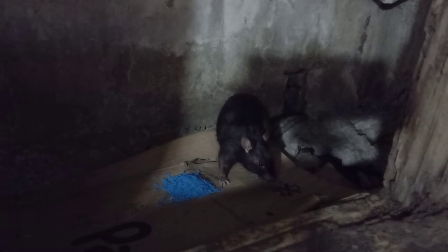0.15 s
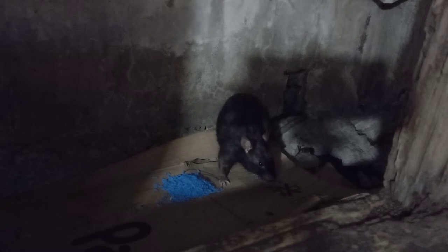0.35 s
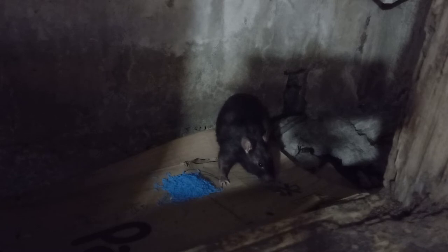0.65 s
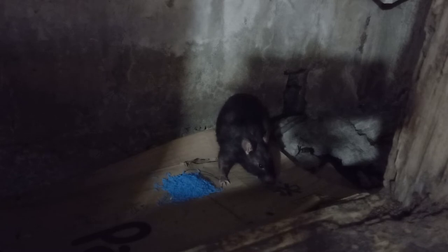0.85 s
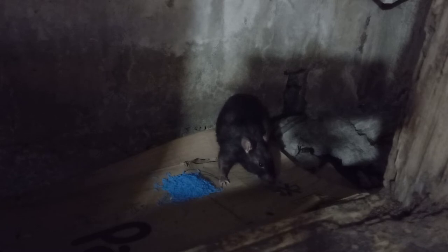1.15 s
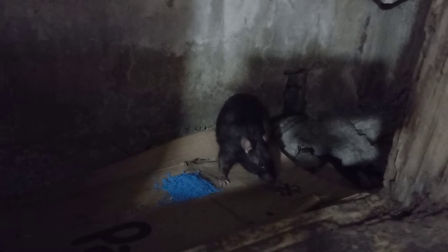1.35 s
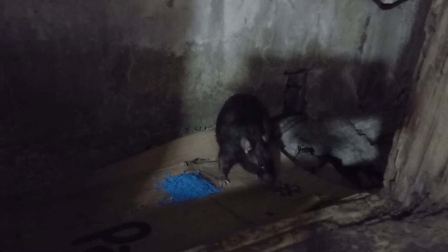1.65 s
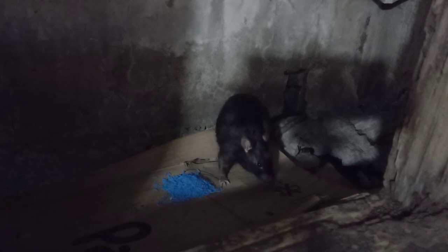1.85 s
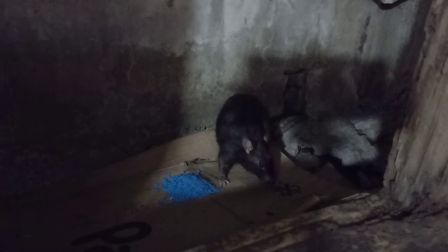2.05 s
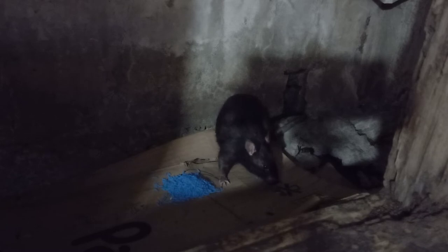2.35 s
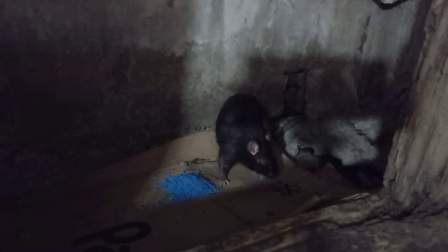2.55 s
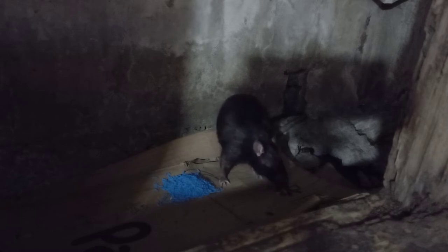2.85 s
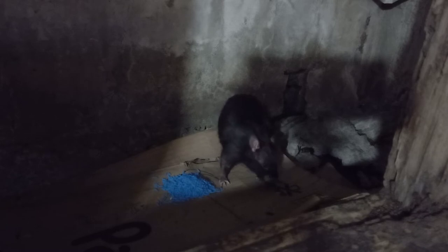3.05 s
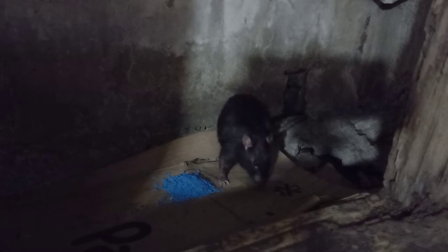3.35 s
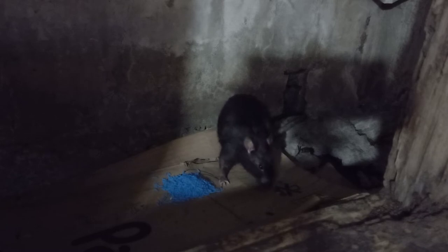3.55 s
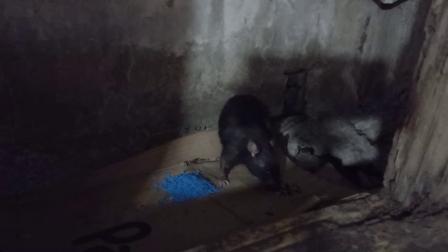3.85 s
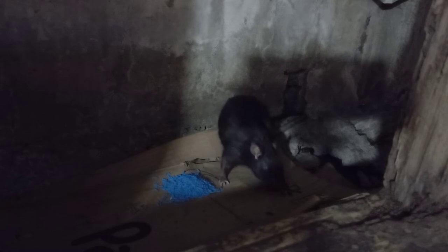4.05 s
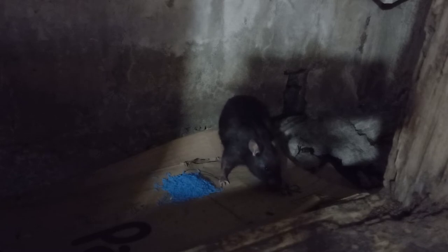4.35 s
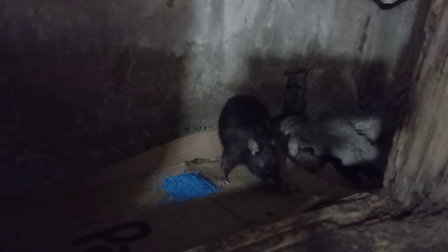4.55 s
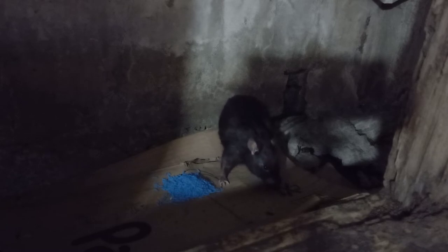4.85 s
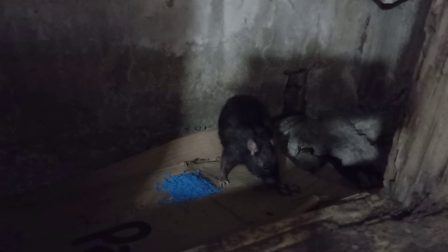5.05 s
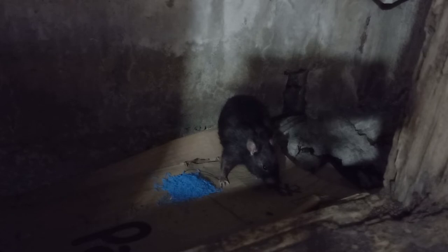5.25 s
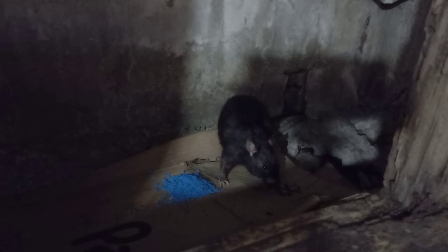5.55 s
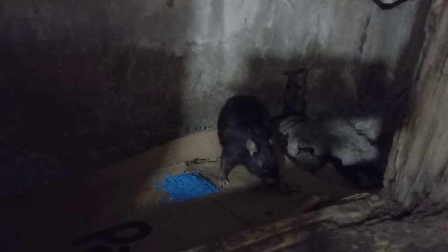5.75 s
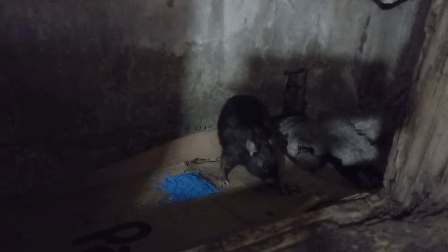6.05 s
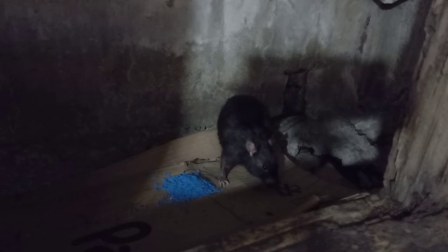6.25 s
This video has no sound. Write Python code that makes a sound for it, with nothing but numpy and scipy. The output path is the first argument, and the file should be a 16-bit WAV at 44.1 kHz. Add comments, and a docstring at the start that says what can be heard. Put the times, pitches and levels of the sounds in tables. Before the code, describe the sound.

Steady low mains hum and airy rush, with crisp gnawing clicks up close, a faint early squeak and a few dull floor thuds.

```python
"""Rat cracking pellets beside a machine

Near a bare masonry corner teeth crack hard pellets: short bursts of impulses ring damped resonances.
A mains-driven machine buzzes and throbs and other motors drone (sums of tones); air rushes (shaped noise).
Further off something squeaks once (three gliding partials in a noise-tail echo); soft scuffs swell
(noise under envelopes) and thuds ring the floor (decaying modes). Two ports of one microphone hear it."""
import sys
import numpy as np
from scipy import signal
from scipy.fft import rfft, irfft, next_fast_len
from scipy.io import wavfile
from scipy.ndimage import map_coordinates

SR = 44100
rng = np.random.default_rng(int(sys.argv[2]) if len(sys.argv) > 2 else 0)


def nominal_scale(level):
    """Amplitude ratio for a level in decibels (scalar or array-like)."""
    x = np.asarray(level, float) / 20
    return 10 ** x


def waveform_to_disk(signal):
    """Save audio, clipped to [-1, 1], as 16-bit WAV at the path in sys.argv[1]."""
    frames = np.transpose(np.atleast_2d(signal))
    scaled = np.clip(frames, -1, 1) * 32767
    samples = np.round(scaled).astype(np.int16)
    wavfile.write(sys.argv[1], SR, samples)


N = 282240


def along(points, hz):
    """Interpolate (f/Hz, value) points on a log-frequency axis."""
    f, v = np.transpose(points)
    return np.interp(np.log(hz + 1), np.log(f + 1), v)


def wobble(knots_per_s):
    """Smooth random curve through normally distributed knots."""
    knots = rng.standard_normal(int(N * knots_per_s / SR) + 4)
    return map_coordinates(knots, [np.arange(N) * knots_per_s / SR])


def filtered(x, response):
    """Multiply the spectrum of x by response(f/Hz), real or complex."""
    m = next_fast_len(x.shape[-1] + 8192)
    spectrum = rfft(x, m) * response(np.fft.rfftfreq(m, 1 / SR))
    return irfft(spectrum, m)[..., :x.shape[-1]]


def diffuse(density, size):
    """Stereo noise from all sides: the mid/side split sets how alike the ports are at each frequency."""
    # port likeness of diffuse sound: f/Hz, correlation (-1..1)
    likeness = [(60, 1), (130, 0.99), (290, 0.91), (640, 0.42), (1410, -0.17), (3100, -0.11), (6820, 0.096),
                (15000, -0.0079)]

    def mid_side_gain(hz):
        angle = np.arccos(np.clip(along(likeness, hz), -1, 1)) / 2
        return np.sqrt(SR / 2) * nominal_scale(along(density, hz)) * [np.cos(angle), np.sin(angle)]

    mid, side = filtered(rng.standard_normal((2, size)), mid_side_gain)
    return np.array([mid + side, mid - side])


def modes(table):
    """Causal response of damped resonances in parallel, with alternating signs."""
    def response(f):
        total = 0
        for k, (centre_hz, width_hz, db) in enumerate(table):
            damping = 1j * f * width_hz
            total = total + (-1) ** k * nominal_scale(db) * damping / (centre_hz ** 2 - f * f + damping)
        return total
    return response


def echo(x, decay, gap_s):
    """Third-of-a-second noise tail per channel, each frequency dying at its own speed."""
    hz, t, z = signal.stft(rng.standard_normal((2, SR // 3)), SR, nperseg=128)
    fade = nominal_scale(-60 * t / along(decay, hz)[:, None])
    tail = signal.istft(z * fade, SR, nperseg=128)[1]
    late = np.pad(x, (round(gap_s * SR), 0))[None]
    return signal.fftconvolve(late, tail / np.linalg.norm(tail[0]), axes=1)[:, :len(x)]


def tone(phase, left_db, right_db, lead_rad):
    """Tone that reaches each port at its own rms level and phase."""
    left = nominal_scale(left_db) * np.cos(phase + lead_rad)
    right = nominal_scale(right_db) * np.cos(phase)
    return np.sqrt(2) * np.array([left, right])


def machines():
    """Mains buzz throbs in level and phase once a shaft turn, more at higher multiples; motors and a fan drone."""
    # loudest buzz lines, mostly odd multiples of twice mains:
    # mains multiple, left level/dB, right level/dB, left lead/rad
    buzz = [(2, -43, -41, 0), (4, -65, -60, -.4), (6, -47, -49, .5), (10, -61, -71, 2.1),
            (14, -68, -71, 2.2), (18, -74, -63, -1.2), (21, -70, -71, 2.7), (22, -59, -62, -3),
            (25, -70, -76, -.9), (26, -60, -66, -1.2), (27, -75, -76, .7), (30, -68, -81, -.9),
            (34, -69, -73, 1.9), (38, -71, -78, 1), (50, -87, -78, -.5), (54, -84, -78, 2.1),
            (69, -83, -98, -1.5), (70, -78, -86, .3), (75, -85, -85, .7)]
    # outline round which the other multiples scatter: f/Hz, level/dB
    faint_outline = [(720, -74), (1700, -78), (2300, -87), (2800, -85.5), (3250, -87), (3500, -99),
                     (4300, -90), (6100, -103.5)]
    # side tones the shaft throb splits off the low hum: mains multiple, shaft orders away, level/dB
    side_tones = [(2, 1, -66), (2, 2, -65), (6, -2, -67), (6, -1, -67), (6, 1, -66)]
    # other motors slipping below mains: shaft f/Hz, left lead/(rad/kHz), [(shaft order, level/dB)]
    motors = [(57.5, -.5, [(1, -63), (2, -64.5), (4, -66.5), (5, -59.5), (9, -65)]),
              (58.17, -3.1, [(3, -66), (14, -75), (15, -76.5), (16, -77), (27, -81.5)]),
              (58.0, -.5, [(20, -79), (21, -71.5), (22, -73)])]
    # unrelated low tones: f/Hz, level/dB
    drones = [(65.5, -60), (70.6, -64.5), (98.9, -60.5), (145.6, -65.5), (166.5, -64.5), (333, -66.5),
              (388.5, -66), (444, -66.5), (532.2, -68.5)]
    # fan tone just under the main hum, beating with it: f/Hz, mean level/dB, t of a swell/s
    fan = (111.65, -52, .023)
    mains_hz = 59.946
    shaft_hz = mains_hz / 8
    faint_scatter_db = 3

    t = np.arange(N) / SR
    loud = [row[0] for row in buzz]
    faint = []
    for k in range(12, 103):
        if k not in loud and (k % 2 == 0 or k > 18):
            ports_db = along(faint_outline, k * mains_hz) + faint_scatter_db * rng.standard_normal(2)
            faint.append((k, *ports_db, rng.uniform(0, 2 * np.pi)))

    out = np.zeros((2, N))
    for k, *ports in buzz + faint:
        depth_rad = .009 * k
        start = rng.uniform(0, 2 * np.pi) * (k > 2)  # the main hum sets time zero
        shaft = 2 * np.pi * shaft_hz * t + rng.uniform(0, 2 * np.pi)
        phase = 2 * np.pi * k * mains_hz * t + start + depth_rad * np.sin(shaft)
        out += (1 + .5 * depth_rad * np.cos(shaft)) * tone(phase, *ports)

    lines = [(hz * k, db, lead * hz * k / 1000) for hz, lead, orders in motors for k, db in orders]
    lines += [(hz, db, 0) for hz, db in drones]
    lines += [(k * mains_hz + away * shaft_hz, db, 0) for k, away, db in side_tones]
    for hz, db, lead in lines:
        phase = 2 * np.pi * hz * t + rng.uniform(0, 2 * np.pi) + 0.16 * wobble(1.35)
        out += tone(phase, db, db, lead)

    hz, db, swell_s = fan
    phase = 2 * np.pi * (hz * t + (2 * mains_hz - hz) * swell_s) + 0.56 * wobble(1.49)
    return out + nominal_scale(3.1 * wobble(2.32)) * tone(phase, db, db, 0)


def air():
    """Smooth far rush: diffuse shaped noise whose level drifts a little."""
    # rushing air and machine noise, ahead of drift and port colour: f/Hz, density/(dB/Hz)
    rush = [(30, -95), (45, -93), (62, -69), (110, -73.5), (170, -73), (290, -76.5), (350, -74),
            (550, -78.5), (700, -87), (1000, -88), (1500, -89.5), (2200, -96.5), (2700, -105), (3300, -106),
            (3600, -111), (3850, -105), (4300, -104), (4900, -107), (6500, -112), (8700, -113),
            (9300, -117), (15200, -120), (15600, -140)]
    drift_db = .7 * wobble(.75) + .6 * wobble(6)
    return nominal_scale(drift_db) * diffuse(rush, N)


def scuffs():
    """Rubbing contacts and faint hissy crunch tails: gritty noise that swells and dies away."""
    # scuffs, ahead of port colour: t of peak/s, rise/s, density/(dB/Hz) of thud, body, hiss
    rubs = [(.03, .011, -86, -72, -114), (.52, 0.039, -85, -78.5, -106), (.99, 0.063, -70.5, -74, -114),
            (2.87, 0.048, -70, -83, -120), (3.121, 0.043, -67.5, -83, -120), (4.04, .05, -79, -74.5, -115),
            (5.185, .035, -65.5, -76, -93.5), (5.265, .03, -69, -77.5, -112),
            (5.868, 0.039, -95, -72.5, -122)]
    # where thud, body and hiss densities apply: f/Hz
    band_hz = [250, 900, 8000]
    # faint hissy crunch tails after bites: t of peak/s, density/(dB/Hz) for all three bands
    crunch_tails = [(.118, -99), (2.285, -112), (3.085, -113), (4.145, -113)]
    scuff_t60_s, crunch_t60_s, crunch_rise_s = 0.33, 0.32, .015
    rasp_hz, rasp_db = 1700, 2  # lift in every colour

    out, t = np.zeros((2, N + SR)), np.arange(SR // 2) / SR
    rows = [(scuff_t60_s, *row) for row in rubs]
    rows += [(crunch_t60_s, s, crunch_rise_s, db, db, db) for s, db in crunch_tails]
    for t60_s, peak_s, rise_s, *dbs in rows:
        attack = np.sin(np.pi / 2 * np.clip(t / rise_s, 0, 1)) ** 2
        decay = nominal_scale(-60 * np.clip(t - rise_s, 0, 1) / t60_s)
        grit = nominal_scale(1.3 * wobble(156)[:len(t)])
        colour = [(40, -120), (70, dbs[0]), *zip(band_hz, dbs), (15000, dbs[-1] - 7)]
        colour.insert(-2, (rasp_hz, along(colour, rasp_hz) + rasp_db))
        start = round((peak_s - rise_s) * SR)
        out[:, start:][:, :len(t)] += attack * decay * grit * diffuse(colour, len(t))
    return out[:, :N]


def thumps():
    """Floor-borne blows: each rings the modes, strongest near its contact pitch, alike at both ports."""
    # blows: t/s, level/dB of a mode at the contact pitch before its decay, contact f/Hz
    blows = [(.021, -37.5, 940), (.54, -43.5, 1000), (.985, -36, 647), (5.149, -26, 427), (5.163, -29, 70),
             (5.172, -31.5, 590), (5.251, -45.5, 1460), (5.282, -33.5, 520), (5.862, -45, 1050)]
    # floor modes: f/Hz, t60/s
    floor = [(67, 0.29), (337, 0.073), (600, 0.033), (970, 0.064), (1460, .12)]
    contact_db_per_oct2 = 34

    out, t = np.zeros(N + SR), np.arange(SR // 2) / SR
    for s, db, contact_hz in blows:
        for hz, t60_s in floor:
            detuning_oct = np.log2(hz / contact_hz)
            level_db = db - contact_db_per_oct2 * detuning_oct ** 2 - 60 * t / t60_s
            onset = 1 - np.exp(-t * hz)
            out[round(s * SR):][:len(t)] += nominal_scale(level_db) * onset * np.sin(2 * np.pi * hz * t)
    return out[:N]


def squeak():
    """Rubbing squeak of three partials on one gliding pitch, heard directly and through a far room's echo."""
    # squeak track, before port and room gains: t/s, f/Hz, first partial level/dB, second partial level/dB
    track = [(.04, 1025, -55, -74), (.075, 1082, -48, -72), (.1, 1092, -49, -65), (.122, 1095, -42, -60),
             (.163, 1082, -38.5, -57), (.173, 1070, -52, -57), (.215, 1060, -51, -61),
             (.24, 1062, -58, -74), (.33, 1070, -68, -95)]
    # far room decay: f/Hz, t60/s
    hall = [(500, .5), (3000, 0.32)]
    third_db = -21  # under the first at its loudest
    third_fades = 2  # extra dB lost per dB the squeak is softer

    s, hz, *dbs = np.transpose(track)
    dbs.append(dbs[0] + third_db + third_fades * (dbs[0] - dbs[0].max()))
    t = np.arange(N) / SR
    pitch_hz = np.interp(t, s, hz) * (1 + .004 * wobble(60))
    phase = 2 * np.pi * np.cumsum(pitch_hz) / SR
    direct = np.zeros(N)
    for k, db in enumerate(dbs):
        level = nominal_scale(np.interp(t, s, db, -120, -120))
        direct += level * np.sqrt(2) * np.sin((k + 1) * phase)
    return nominal_scale([[.6], [.9]]) * direct + nominal_scale(-2.5) * echo(direct, hall, gap_s=.012)


def bites():
    """A main fracture and weaker ones ring four resonance sets; the nook answers at once, the corner lingers."""
    # bites through a pellet, before echoes and port colour: t/s, energy/dB of knock, jaw, pellet, edge
    cracked = [(0.1107, -45, -34, -33, -29), (.5197, -29, -29, -26, -32), (1.4685, -21.5, -28.5, -23, -26),
               (1.6339, -21.5, -33, -25.5, -28.5), (2.023, -28.5, -29, -31, -32.5),
               (5.4353, -31, -27, -31, -30), (6.0057, -30, -25.5, -25, -24.5),
               (6.2265, -30.5, -29, -32, -35)]
    # faint tooth ticks while grinding: t/s, level/dB
    ticks = [(2.2164, -42), (2.2417, -39), (2.5047, -49), (2.7244, -43), (2.7615, -43), (3.0347, -40),
             (3.0723, -43), (3.255, -45.5), (3.549, -41.5), (3.7899, -46), (3.8094, -36.5), (4.0111, -43),
             (4.1383, -45), (4.9153, -45), (4.942, -43)]
    # tick energies over the tick's level: knock, jaw, pellet, edge /dB
    tick_balance = [-3, 0.5, 1, -3]
    # resonances heard in every bite, low to high, each: f/Hz, width/Hz, relative level/dB
    knock = [(1270, 1020, 0)]
    jaw = [(3150, 1000, -7.5), (4430, 990, 3.5)]
    pellet = [(7000, 1300, 2.5), (7730, 990, 8.5)]
    edge = [(9860, 2300, 3), (12400, 4100, -1.5)]
    # echo decays: f/Hz, t60/s
    nook = [(1000, 0.072), (14000, 0.02)]
    corner = [(1000, 0.69), (5000, 0.28), (14000, 0.22)]
    # left port, turned away from the rat: f/Hz, gain/dB
    shade = [(1300, 3), (4000, -2.5), (7000, -6), (10000, -9), (14000, -5)]
    # right port, facing the rat: f/Hz, gain/dB
    facing = [(1300, 1.9), (4000, 0.87), (7000, 1), (10000, 2.5), (14000, 4.1)]

    out, size = np.zeros((2, N + SR)), SR // 4
    events = cracked + [(s, *(db + np.array(tick_balance))) for s, db in ticks]
    for s, *dbs in events:
        cracks = np.zeros(size)
        cracks[0] = 1
        cracks[rng.integers(8, 90, size=4)] = .22 * rng.standard_normal(4)
        rings = [filtered(cracks, modes(resonances)) for resonances in (knock, jaw, pellet, edge)]
        # the low knock is steeply dulled: its resonance acts twice
        rings[0] = -filtered(rings[0], modes(knock))
        snap = sum(nominal_scale(db) * ring / np.linalg.norm(ring) for db, ring in zip(dbs, rings))
        heard = np.array([snap, np.roll(snap, 14)])  # left port nearer by 14 samples
        heard += nominal_scale(-1.5) * echo(snap, nook, gap_s=.001)
        heard += nominal_scale(-8) * echo(snap, corner, gap_s=.004)
        out[:, round(s * SR):][:, :size] += heard
    return filtered(out[:, :N], lambda hz: nominal_scale([along(shade, hz), along(facing, hz)]))


def scene():
    """Tones, thumps and bites as they stand at the ports; air and scuffs take the right port's colour."""
    # right port's own treble colour: f/Hz, right over left/dB
    port_colour = [(2600, 0.5), (3200, 3.5), (3600, -3), (7000, -0.5), (7800, 4.5), (8700, -1), (9400, 3.5),
                   (12000, 2), (15000, 1)]
    port_gain = lambda hz: nominal_scale([0 * hz, along(port_colour, hz)])
    at_ports = machines() + thumps() + squeak() + bites()
    return at_ports + filtered(air() + scuffs(), port_gain)


def roll_off(x):
    """The treble ends steeply here."""
    return signal.sosfilt(signal.butter(12, 16480, fs=SR, output="sos"), x)


def record(dry):
    """Steep treble roll-off: flat to 15.3 kHz, 15 dB down from 16.4 kHz."""
    rolled = filtered(dry, lambda hz: nominal_scale(np.interp(hz, [15300, 16400], [0, -15])))
    return roll_off(rolled)


dry = scene()
out = record(dry)
waveform_to_disk(out)
```